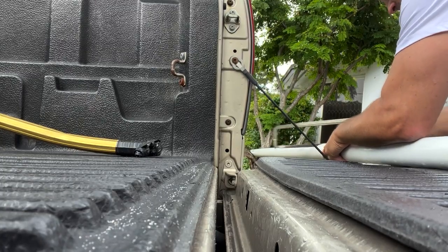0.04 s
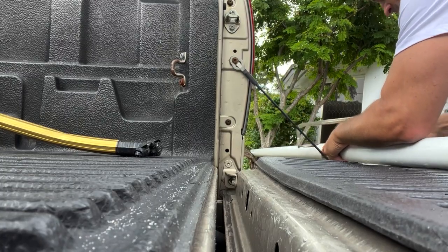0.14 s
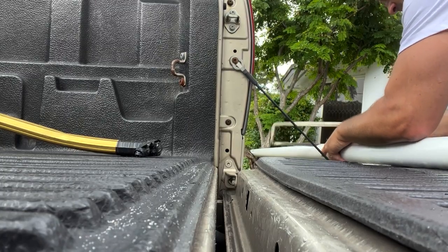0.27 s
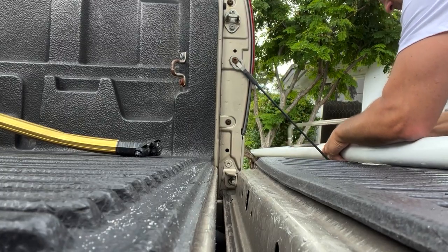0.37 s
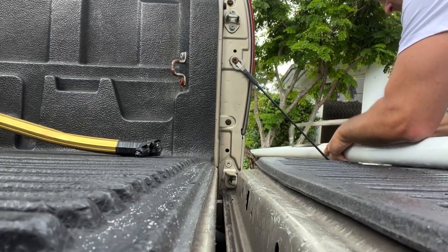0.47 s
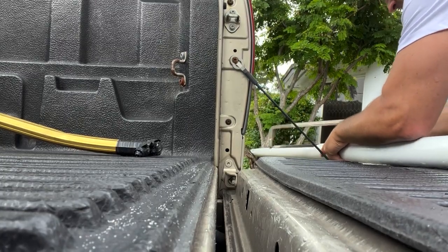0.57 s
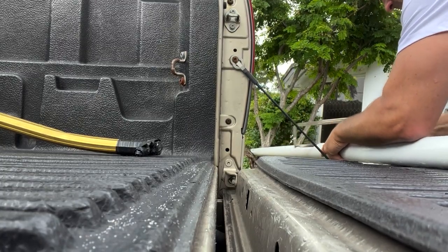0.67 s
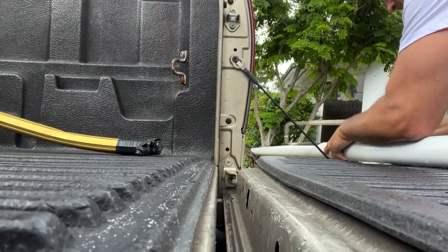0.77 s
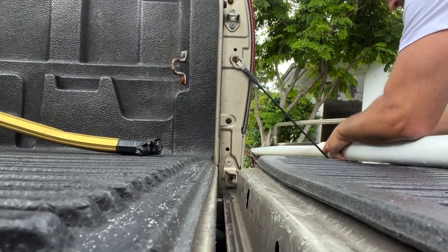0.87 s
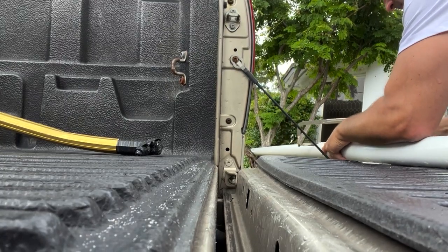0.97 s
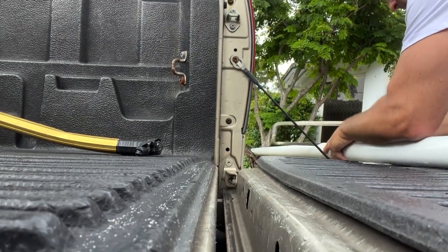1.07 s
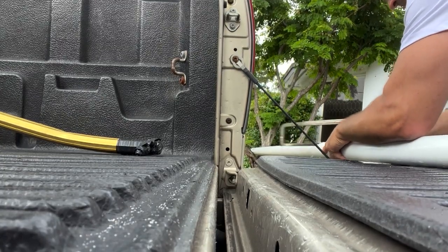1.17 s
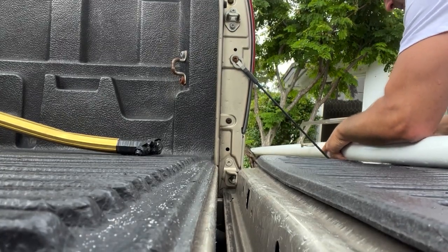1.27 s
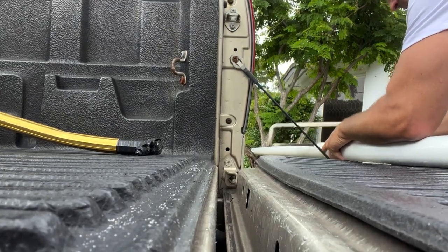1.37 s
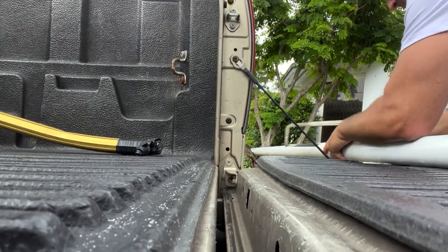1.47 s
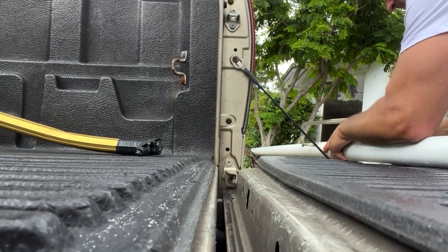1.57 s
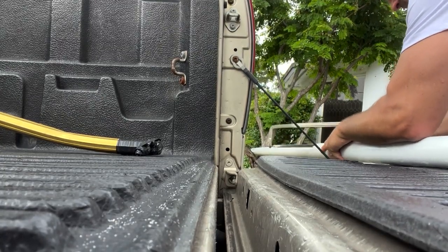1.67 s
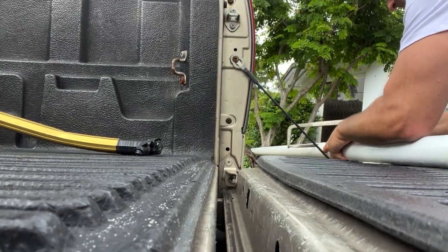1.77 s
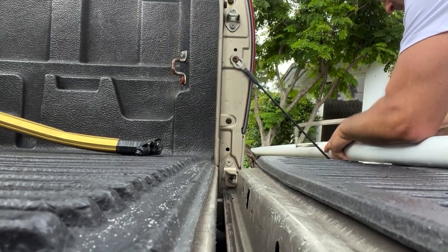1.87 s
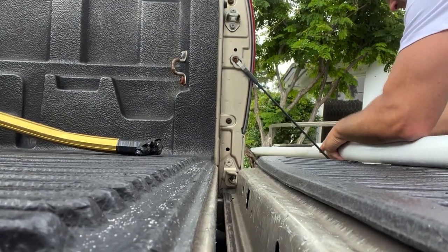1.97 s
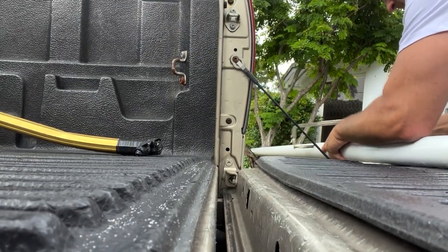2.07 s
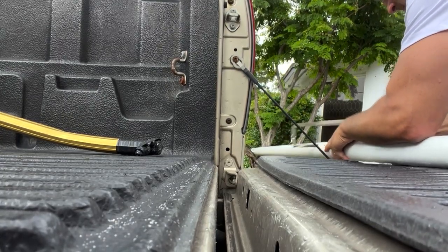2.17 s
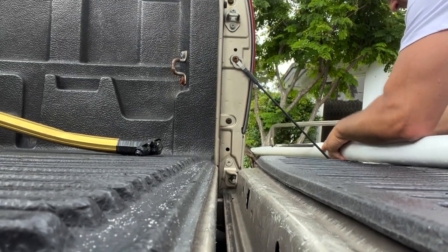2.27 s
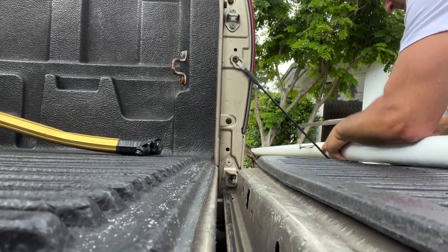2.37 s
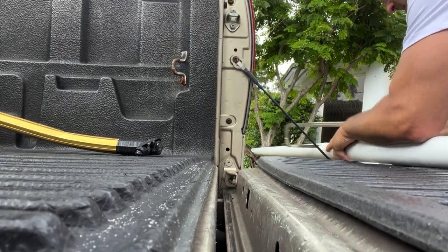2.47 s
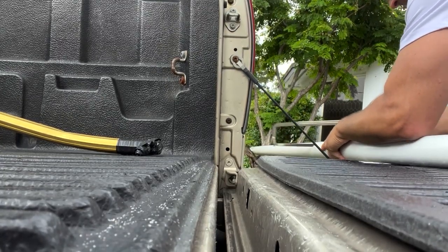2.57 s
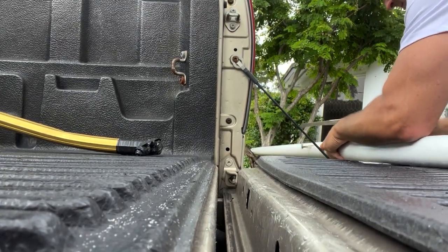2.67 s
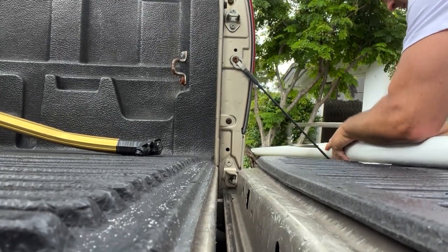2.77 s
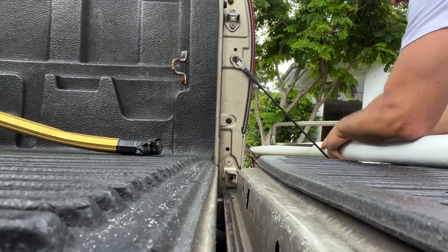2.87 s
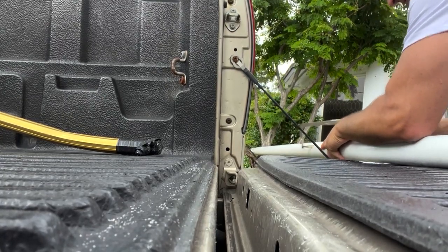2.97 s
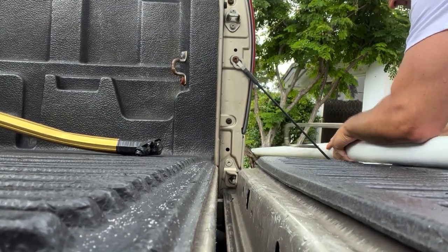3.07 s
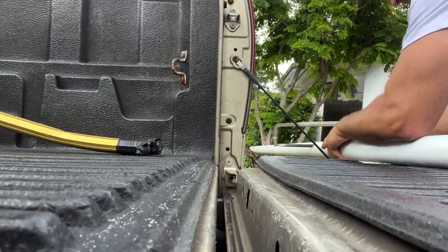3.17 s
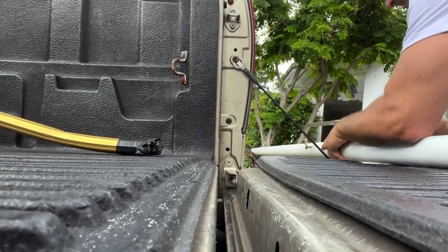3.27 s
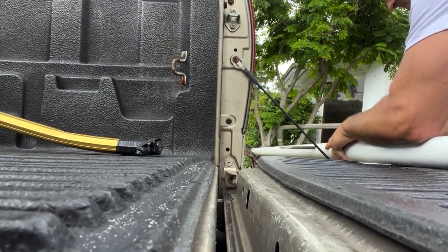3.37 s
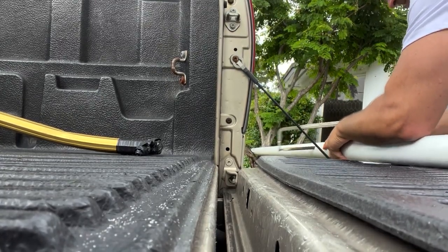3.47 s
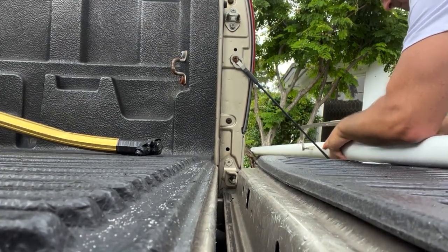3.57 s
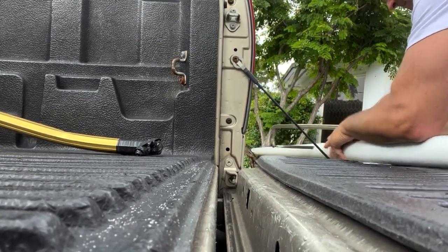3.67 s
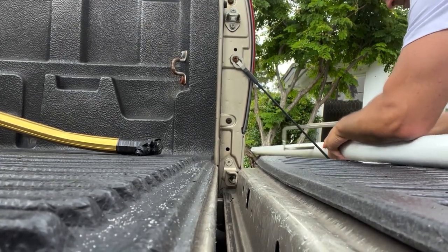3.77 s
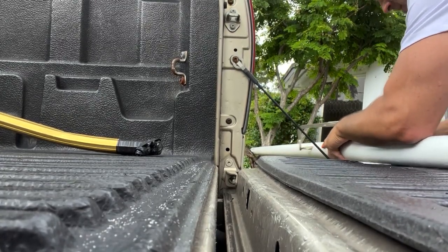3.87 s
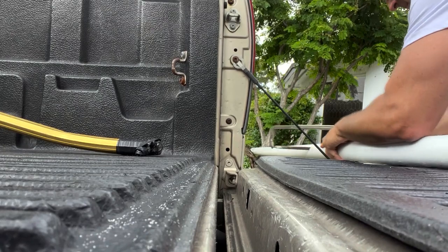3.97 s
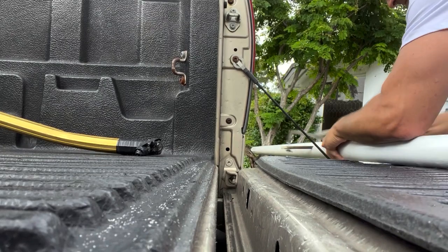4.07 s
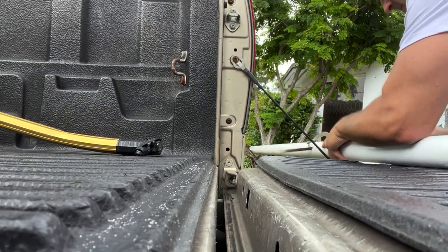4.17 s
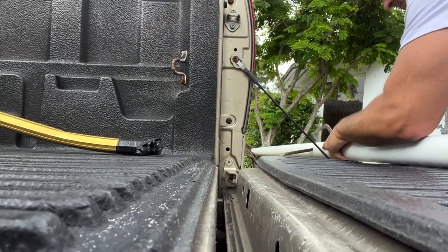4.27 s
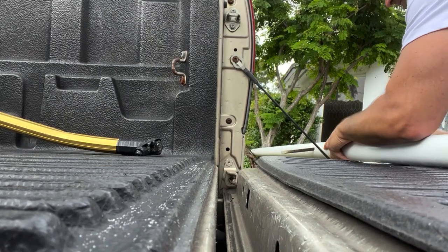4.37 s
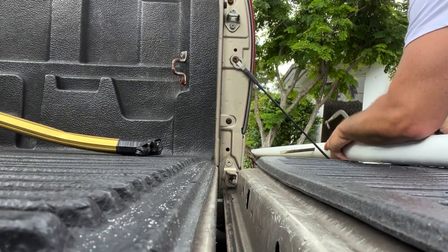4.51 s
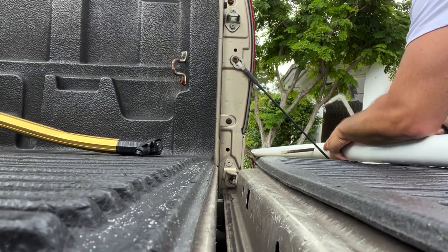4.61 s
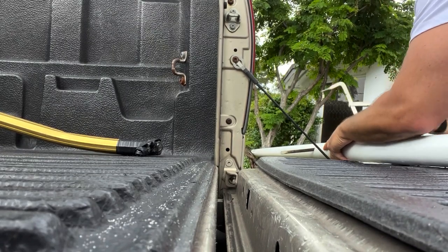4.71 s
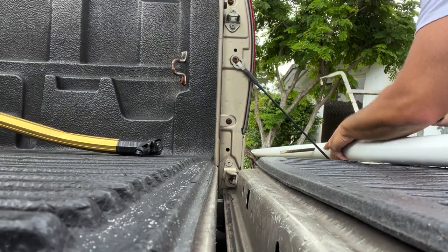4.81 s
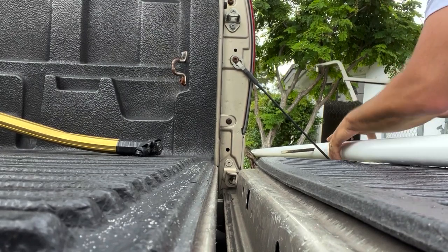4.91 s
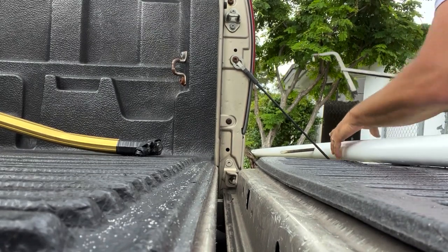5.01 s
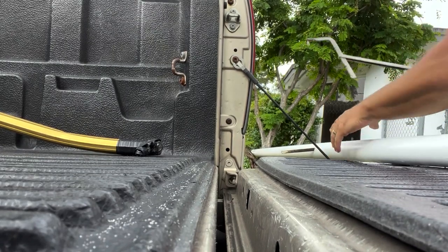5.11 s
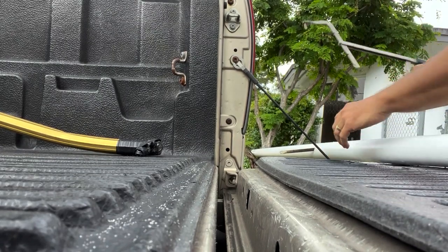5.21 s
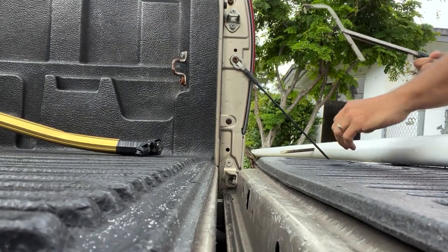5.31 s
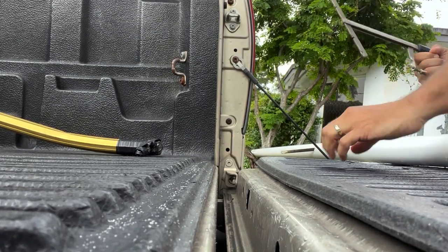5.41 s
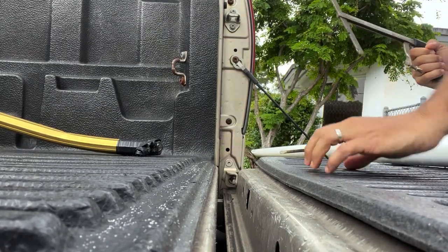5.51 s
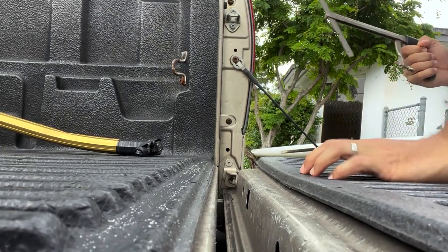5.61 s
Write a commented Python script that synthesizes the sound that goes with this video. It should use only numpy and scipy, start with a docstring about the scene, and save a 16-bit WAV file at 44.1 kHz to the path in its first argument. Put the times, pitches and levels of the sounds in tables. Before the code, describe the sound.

A hand hacksaw is already cutting a hollow plastic pipe on a truck's open tailgate, heard close in stereo from the bed, somewhat stronger on the right. The first second is hurried and uneven, with doubled bites; then the rhythm settles to about three and a half push-pull cycles a second. Every push starts abruptly: a sharp click, a hollow knock around 600 to 800 Hz, coarse juddering rasp and a low boom from the bed. Pulls are softer, scraping swells, many with a brief squeaky chatter near 1200 Hz, usually gliding down, brightest at the last, about 3.9 seconds. The last push is near 4.0, a faint pull follows, and sawing ends by about 4.3. Low distant traffic rumble, present throughout, is now exposed. A light tick comes at 4.7, fainter ones by 4.9, then a soft skin slide around 5.45 as the hand lets go.

```python
"""A hacksaw cuts a plastic pipe held on a truck's open tailgate, heard by two microphones in the bed.
From the start, far traffic rumbles low; pushes and pulls scrape the blade, judder the pipe and boom the bed.
The pushes slap the pipe on the tailgate, a click with a hollow knock; on pulls the teeth chatter at a pitch.
The sawing stops after about four seconds; then come light ticks of the saw frame and a hand sliding off.
Noise is shaped by filters and resonances; the chatter and the ringing pipe wall are made of sine waves."""
import sys
import numpy as np
from scipy import signal
from scipy.fft import rfft, irfft, next_fast_len
from scipy.io import wavfile
from scipy.ndimage import uniform_filter1d, map_coordinates

SR = 44100
rng = np.random.default_rng(int(sys.argv[2]) if len(sys.argv) > 2 else 0)


def generate_wav(signal):
    """Clip the signal to [-1, 1] and save it as 16-bit WAV at the path in sys.argv[1]."""
    frames = np.transpose(np.atleast_2d(signal))
    scaled = np.clip(frames, -1, 1) * 32767
    pcm = np.round(scaled).astype(np.int16)
    wavfile.write(sys.argv[1], SR, pcm)


N = 249165  # samples in the scene

# Table levels in dB are relative: each sound below adds its own shaping and natural unevenness.


def amp(db):
    """Turn decibels into a plain multiplier."""
    return 10 ** (np.asarray(db) / 20)


def unit(x):
    """Scale a sound to an average (RMS) strength of 1."""
    return x / np.sqrt(np.mean(x ** 2) + 1e-20)


def along(points, hz):
    """Read a curve of (pitch_hz, value) points, with pitch on a log axis."""
    f, v = np.transpose(points)
    return np.interp(np.log(hz + 1), np.log(f + 1), v)


def level_curve(rows):
    """Join (time_s, level_db) points into one level per sample."""
    time_s, level_db = np.transpose(rows)
    return np.interp(np.arange(N) / SR, time_s, level_db)


def wobble(rate):
    """A smooth random curve with this many random points a second."""
    points = rng.standard_normal(int(N * rate / SR) + 4)
    return map_coordinates(points, [np.arange(N) * rate / SR])


def filtered(x, response):
    """Multiply the spectrum of x by a response that depends on frequency."""
    m = next_fast_len(N + SR // 2)
    hz = np.fft.rfftfreq(m, 1 / SR)
    return irfft(rfft(x, m) * response(hz), m)[..., :N]


def coloured(x, spectrum):
    """Shape x to a spectrum with a filter that never sounds early, fading out beyond the spectrum's ends."""
    closed_ends = [(5, -80)] + list(spectrum) + [(SR / 2, -80)]

    def response(hz):
        # folding the cepstrum forward in time gives the minimum-phase filter
        cepstrum = irfft(np.log(amp(along(closed_ends, hz))))
        half = len(cepstrum) // 2
        cepstrum[1:half] *= 2
        cepstrum[half + 1:] = 0
        return np.exp(rfft(cepstrum))
    return filtered(x, response)


def resonant(x, modes):
    """Ring x through resonances given as (pitch_hz, width_hz, level_db)."""
    def response(hz):
        total = 0
        for k, (centre, width, db) in enumerate(modes):
            damping = 1j * hz * width
            # neighbouring resonances get opposite signs
            total = total + (-1) ** k * amp(db) * damping / (centre * centre - hz * hz + damping)
        return total
    return filtered(x, response)


def gritty(rate, spread_db, share, patchy_db):
    """Two unrelated streams of patchy noise, both jolted by the same random slips (rate per second)."""
    slips = (rng.random(N) < rate / SR) * amp(spread_db * rng.standard_normal(N))
    burst = signal.lfilter([1], [1, -np.exp(-1 / (.0012 * SR))], slips ** 2)  # power dies over 1.2 ms
    z = signal.stft(rng.standard_normal((2, N)), nperseg=256)[2]
    field = uniform_filter1d(rng.standard_normal(z.shape[1:]), size=3, axis=0)
    field = uniform_filter1d(field, size=8, axis=1)
    patchy = z * amp(patchy_db * unit(field))
    noise = signal.istft(patchy, nperseg=256)[1][:, :N]
    return noise * np.sqrt(abs(1 - share) + abs(share) * burst / burst.mean())


SPEED_UP, SLOW_DOWN = 0.49, 0.49  # shares of a swell's length in which it gains and loses 9 dB


def bell(t, at, length, rise=SPEED_UP, fall=SLOW_DOWN):
    """A rounded swell, in dB below its peak."""
    side = np.where(t < at, rise, fall)
    return -9 * ((t - at) / (length * side)) ** 2


# the blade bites forward; columns: start_s, held_s, boom_db, judder_db, scrape_db
PUSHES = [(0.0, 0.032, -18, -18, -31.5), (0.069, .055, -23.5, -14.5, -29.5),
          (0.267, 0.0072, -30, -24.5, -40), (0.347, 0.016, -28, -19.5, -31),
          (0.531, 0.077, -24.5, -17.5, -31), (0.615, 0.029, -24.5, -22, -31),
          (0.8093, .05, -24, -16, -29.5), (0.889, 0.03, -24.5, -19, -31.5),
          (1.0745, 0.087, -23.5, -18.5, -30), (1.3635, 0.088, -23, -19, -28.5),
          (1.656, 0.041, -25, -16.5, -28), (1.724, 0.085, -26, -22, -38), (1.9395, 0.1, -22, -18, -27.5),
          (2.2283, 0.034, -27.5, -17.5, -26.5), (2.5095, 0.034, -18.5, -15.5, -27.5),
          (2.815, 0.041, -24, -15, -27.5), (3.103, 0.026, -25, -15, -26.5), (3.1806, 0.029, -24, -21, -29),
          (3.3996, 0.051, -21.5, -19, -29.5), (3.4746, 0.021, -31, -24, -32),
          (3.6703, 0.044, -24.5, -18.5, -32), (3.958, 0.063, -24, -15.5, -26),
          (4.029, 0.017, -26.5, -25, -27)]
# the blade draws back; columns: fastest_s, length_s, boom_db, judder_db, scrape_db
PULLS = [(0.17, .06, -34, -34, -30), (0.301, 0.067, -36, -32.5, -38), (0.435, 0.095, -32, -34.5, -31),
         (0.71, 0.08, -34, -41, -36.5), (0.984, 0.074, -30, -36, -32), (1.287, 0.068, -36, -34.5, -30.5),
         (1.584, 0.074, -32.5, -35.5, -32.5), (1.855, 0.059, -36, -33, -31.5),
         (2.134, .07, -33.5, -31, -29.5), (2.416, 0.097, -29.5, -36, -32.5), (2.718, .08, -29, -39.5, -32),
         (3.014, 0.089, -32, -36, -34.5), (3.305, 0.061, -39, -38, -31.5), (3.584, 0.076, -30, -30, -30.5),
         (3.874, 0.063, -29.5, -39, -26.5), (4.118, 0.056, -31.5, -38, -42.5),
         (4.22, 0.028, -31, -41, -47.5)]
# settings below hold one value each for boom, judder and scrape
BITE_S = (0.02, 0.0055, 0.0021)  # how slowly a push starts
SAG_DB_PER_S, DROP_DB_PER_S = (31, 61.5, 107), (88.5, 126.5, 154)  # while held, and extra once let go
SPREAD = (3.3, 2.4, 1.04)  # multiplies the length of a pull
# the blade resting in the cut, until it is lifted out
CONTACT_DB, LIFT_S, LIFT_DB_PER_S = (-35, -38, -46.5), (4.27, 4.2, 4.08), (204, 170, 280)


def effort():
    """Loudness of boom, judder and scrape: pushes bite and die away, pulls swell, the resting blade fills in."""
    t = np.arange(N) / SR

    def column(values):
        return np.reshape(values, (-1, 1))

    lifted = np.maximum(t - column(LIFT_S), 0)
    power = amp(column(CONTACT_DB) - column(LIFT_DB_PER_S) * lifted) ** 2
    for start, held, *levels_db in PUSHES:
        at = round(start * SR)
        u = t[:SR // 2]
        let_go = np.maximum(u - held, 0)
        fall_db = column(SAG_DB_PER_S) * u + column(DROP_DB_PER_S) * let_go
        # a push at time zero is already under way
        rise = 1 - np.exp(-(u / column(BITE_S)) ** 2) if start else 1
        power[:, at:at + len(u)] += (rise * amp(column(levels_db) - fall_db)) ** 2
    for fastest, length, *levels_db in PULLS:
        middle = round(fastest * SR)
        span = slice(max(middle - SR // 4, 0), middle + SR // 4)
        swell_db = bell(t[span], fastest, length * column(SPREAD))
        power[:, span] += amp(column(levels_db) + swell_db) ** 2
    return np.sqrt(power)


# tone colour of the bed, the pipe and the blade; columns: pitch_hz, level_db
BOOM_COLOUR = [(20, -36), (35, -22), (60, -15), (100, -10.5), (160, -9), (200, -10.5), (260, -14.5),
               (350, -17.5)]
JUDDER_COLOUR = [(170, -29), (270, 0), (430, 0), (620, -2.5), (800, -0.5), (1000, -4.5), (1300, -8.5),
                 (1900, -10.5), (2600, -17.5), (3300, -21), (5000, -38.5)]
SCRAPE_COLOUR = [(900, 3), (1900, -8.5), (2650, -2), (3200, -9), (3700, -7), (4600, -10), (6000, -16),
                 (7200, -12), (8300, -20), (9300, -12), (10500, -12), (12000, -20.5), (13200, -25.5),
                 (14500, -21.5), (15500, -48)]
# resonances of the bed panels; columns: pitch_hz, width_hz, level_db
BED_RESONANCES = [(122, 20, -6), (152, 18, 3), (180, 22, -2), (208, 16, 0)]
# resonances of the hollow pipe, also used by the slaps; columns: pitch_hz, width_hz, level_db
PIPE_RESONANCES = [(620.5, 170, 7), (787, 536, -1), (438, 70, -4.5)]


def stroke(boom_gain, judder_gain, scrape_gain):
    """The teeth tear the plastic: the blade scrapes, the pipe judders, the bed booms."""
    lumps = wobble(45)  # uneven bite, felt by pipe and blade
    shake, panels = rng.standard_normal((2, 2, N))
    bed = unit(coloured(shake, BOOM_COLOUR) + amp(-4.0) * resonant(panels, BED_RESONANCES))
    boom = boom_gain * amp(2.0 * wobble(14)) * bed

    tear = gritty(300, 3.5, share=.45, patchy_db=1.5)
    pipe = unit(coloured(tear, JUDDER_COLOUR) + amp(-11) * resonant(tear, PIPE_RESONANCES))
    dull = filtered(pipe, lambda hz: 1 / (1 + (hz / 1500) ** 4))
    # a dying judder loses its treble first
    treble_gain = np.minimum(judder_gain / amp(-29.5), 1) ** 0.73
    pipe = dull + treble_gain * (pipe - dull)
    judder = judder_gain * amp(1.8 * lumps) * pipe

    tear = gritty(500, 3.5, share=.35, patchy_db=2.5)
    scrape = scrape_gain * amp(2.7 * lumps) * unit(coloured(tear, SCRAPE_COLOUR))
    return boom + judder + scrape


# lowest resonances of the tailgate; columns: pitch_hz, width_hz, level_db
GATE_RESONANCES = [(76, 12, 0), (55, 14, -9)]
SWAY_DB, SWAY_S = -9.5, .15  # rocking under the boom, and the time it is smoothed over


def tailgate(boom_gain):
    """The strokes shake the tailgate at its lowest resonances, with a sluggish rise and fall."""
    rocking = uniform_filter1d(boom_gain, round(SWAY_S * SR))
    rumble = resonant(rng.standard_normal((2, N)), GATE_RESONANCES)
    rumble = resonant(rumble, [(68, 60, 0)])
    return amp(SWAY_DB) * rocking * unit(rumble)


# loudness of the traffic, steady before the first row; columns: time_s, level_db
TRAFFIC = [(4.4, -50), (5.4, -50), (5.65, -47)]
# tone colour of the far rumble; columns: pitch_hz, level_db
TRAFFIC_COLOUR = [(30, -11), (60, 4.5), (110, -0.9), (200, -6), (400, -13), (800, -19), (1600, -27),
                  (3000, -38), (5000, -48), (8000, -55), (11000, -49.5), (14000, -70.5)]


def traffic():
    """A low far rumble, partly alike at both microphones in the bass and less so higher up."""
    a, b = unit(coloured(rng.standard_normal((2, N)), TRAFFIC_COLOUR))

    def shared(hz):
        return np.clip(0.58 / (1 + hz / 300), 0, 1)

    b = filtered(a, shared) + filtered(b, lambda hz: np.sqrt(1 - shared(hz) ** 2))
    return amp(level_curve(TRAFFIC) + 0.99 * wobble(8.3)) * np.array([a, b])


# the pipe slaps the tailgate; columns: start_s, crack_db, hollow_knock_db
SLAPS = [(0.069, -10.5, -5.5), (0.2684, -28.5, -8), (0.3167, -38.5, -21.5), (0.346, -17, -4.5),
         (0.5321, -9.5, -2), (0.6168, -20.5, -9), (0.8084, -11.5, -9.5), (0.891, -19.5, -7),
         (1.0751, -11.5, -3.5), (1.3638, -9, -3.5), (1.4432, -31, -12), (1.4834, -32.5, -21),
         (1.5876, -39.5, -26), (1.6576, -10.5, -5), (1.724, -23, -15.5), (1.8727, -38, -18.5),
         (1.9412, -12.5, -5), (2.2301, -13, -3), (2.436, -31.5, -24), (2.5101, -9.5, -3),
         (2.8154, -11.5, -0.5), (2.9293, -39, -15), (3.105, -12.5, -4), (3.1824, -28.5, -14),
         (3.1871, -21.5, -14.5), (3.3986, -12.5, 1), (3.4742, -22.5, -10), (3.5599, -33.5, -23),
         (3.6714, -13, -2.5), (3.9582, -14, 1), (4.0307, -24.5, -21)]
# tone colour of the crack; columns: pitch_hz, level_db
CRACK_COLOUR = [(500, -19.5), (1000, -9), (1900, 1), (2600, -6), (4600, -7.5), (6000, -15), (8000, -15),
                (10500, -32.5), (13500, -38.5), (15500, -47.5)]
# ringing of the pipe wall; columns: pitch_hz, level_db, time_to_fall_60_db_s
WALL_RINGS = [(1850, -2, .015), (2650, -3, .015), (3560, -5, .011), (4600, -5, .01)]


def slaps():
    """A rattling contact of a few ms rings the wall; two soft pushes then build up the hollow of the pipe."""
    crack, wall, blows = np.zeros((2, N + SR)), np.zeros((2, N + SR)), np.zeros((2, N))
    t = np.arange(SR // 10) / SR
    contact = (1 - np.exp(-t / .0003)) * amp(-700 * t) / (1 + (t / .005) ** 5)
    noise = coloured(rng.standard_normal((2, N)), CRACK_COLOUR)
    for start, crack_db, knock_db in SLAPS:
        at = round(start * SR)
        span = slice(at, at + len(t))
        rattle = contact * noise[:, span]
        # even out the energy of the rattles before setting the level
        even_rattle = rattle / np.linalg.norm(rattle[0]) * np.linalg.norm(contact)
        crack[:, span] += amp(crack_db + 1.5) * even_rattle
        for hz, level, t60 in WALL_RINGS:
            ring = np.sin(2 * np.pi * (hz * t + rng.random((2, 1))))
            ring_db = crack_db + 3.5 + level + rng.normal(0, 1.9) - 60 * t / t60
            wall[:, span] += amp(ring_db) * (1 - np.exp(-t / .0006)) * ring
        blows[:, at + round(.0022 * SR)] = 0.33 * amp(knock_db + 28.5)
        blows[:, at + round(.0039 * SR)] = amp(knock_db + 30)
    soft = filtered(blows, lambda hz: 1 / (1 + 1j * hz / 1500) ** 2)
    knock = resonant(soft, PIPE_RESONANCES)
    # the bed walls scatter less of a slap: the second stream is 4 dB weaker
    return (crack[:, :N] + wall[:, :N] + knock) * amp([[0], [-4]])


# the teeth skip on a pull; columns: loudest_s, length_s, from_hz, to_hz, tone_db, overtone_db
CHATTER = [(0.44, .04, 1191, 1000, -17, -50), (0.731, 0.052, 1155, 1016, -22, -53),
           (0.977, .06, 1312, 1269, -25, -53), (1.274, 0.083, 1327, 1088, -22, -40),
           (1.575, 0.078, 1287, 1314, -28.5, -53), (1.864, .06, 1200, 1060, -29, -50),
           (2.135, 0.059, 1342, 1190, -16, -30), (2.409, .07, 1430, 1200, -29, -47),
           (2.728, 0.063, 1297, 1300, -26, -44), (2.996, 0.048, 1310, 1350, -22, -43),
           (3.302, 0.068, 1363, 1050, -21, -36.5), (3.576, 0.058, 1340, 1160, -17.5, -34.5),
           (3.873, 0.069, 1450, 1274, -15.5, -23.5)]
# overtones of the tooth rate; columns: multiple (no unit), level_db
OVERTONES = [(2, 4), (3, -6.5), (4, -13)]
BEND = 1.5  # the tooth rate changes little at first and faster late (1 = evenly)
CATCH, SLIP = .4, .5  # shares of the length in which the tone gains and loses 9 dB


def chatter():
    """On a fast pull the teeth skip regularly: a gliding tone with overtones, blurred by uneven teeth."""
    out, t = np.zeros((2, N)), np.arange(N) / SR
    drift = np.array([wobble(250), wobble(250)])
    uneven = 1 + .45 * np.array([wobble(330), wobble(330)])
    flicker = 1 + .4 * np.array([wobble(200), wobble(200)])
    for loudest, length, from_hz, to_hz, tone_db, bright_db in CHATTER:
        middle = round(loudest * SR)
        span = slice(middle - SR // 10, middle + SR // 10)
        # the glide may run on a little past to_hz
        progress = np.clip((t[span] - loudest) / length + .5, 0, 1.3)
        hz = from_hz + (to_hz - from_hz) * progress ** BEND
        turn = 2 * np.pi * np.cumsum(hz * (1 + .026 * drift[:, span]), axis=1) / SR
        fade = amp(bell(t[span], loudest, length, CATCH, SLIP))
        tone = amp(tone_db) * uneven[:, span] * np.sin(turn)
        upper = sum(amp(level) * np.sin(k * turn) for k, level in OVERTONES)
        # overtones fade twice as steeply as the tone
        out[:, span] += fade * (tone + fade * amp(bright_db) * flicker[:, span] * upper)
    return out


# light touches of the saw frame; columns: start_s, level_db
TICKS = [(4.6867, -45.5), (4.762, -61), (4.861, -51.5)]
# tone colour of a tick; columns: pitch_hz, level_db
TICK_COLOUR = [(1000, -4), (1600, -7), (3000, -8), (5000, -12), (8000, -12), (11000, -14), (14000, -26)]


def ticks():
    """The frame brushes the pipe: bursts of noise with a soft start and a scattered tail."""
    out, t = np.zeros((2, N + SR)), np.arange(SR // 5) / SR
    shape = (amp(-60 * t / .05) + .6 * amp(-60 * t / .2)) * (1 - np.exp(-t / .001))
    for start, db in TICKS:
        at = round(start * SR)
        out[:, at:at + len(t)] += amp(db + 1.0) * shape * rng.standard_normal((2, len(t)))
    return coloured(out[:, :N], TICK_COLOUR)


# loudness of the sliding hand; columns: time_s, level_db
HAND = [(5.05, -93), (5.3, -66), (5.4, -67.5), (5.43, -56), (5.46, -50), (5.51, -53.5), (5.65, -66)]
# tone colour of skin on the pipe; columns: pitch_hz, level_db
HAND_COLOUR = [(400, 0), (800, 3.5), (1600, -14.5), (3000, -17.5), (5000, -19.5), (8000, -24.5),
               (11000, -28), (14000, -31)]


def hand():
    """Skin drags over the pipe as the hand lets go: gritty noise that swells and fades."""
    drag = gritty(200, 3, share=.35, patchy_db=3)
    return amp(level_curve(HAND) + 1.5 * wobble(45)) * unit(coloured(drag, HAND_COLOUR))


# level difference of the two microphones; columns: pitch_hz, left_minus_right_db
LOUDER = [(60, -1), (200, -3), (600, -6.5), (1300, -3.5), (2200, -0.5), (3200, -3.5), (4600, -4.5),
          (6000, -6), (8000, -1), (10000, -0.2), (14000, 0)]
# phase of the left one, negative when it lags; columns: pitch_hz, left_leads_rad
LEADS = [(0, 0), (60, -.3), (130, -.9), (270, -1.2), (690, -2.8), (1550, -3.2), (1950, -6), (2670, -7.3),
         (3100, -8.3), (6200, -10.3), (7100, -9.8), (8600, -9.3), (10800, -6.5), (12900, -6.2),
         (13900, -3.4), (15300, -3.1)]
# how much the left shares with the right; columns: pitch_hz, likeness (0 to 1, no unit)
ALIKE = [(40, 0.76), (250, .75), (600, 0.69), (1100, 0.55), (1900, 0.3), (2700, 0.25), (4000, 0.054),
         (6000, 0.28), (7500, 0.92), (8400, 0.83), (9800, 0.48), (11000, .98), (12700, 1), (13500, 0.69),
         (14600, 1)]


def ports(pair):
    """The right faces the saw; the left is later, weaker near 600 and 6000 Hz, mixed with bed-wall scatter."""
    direct, scattered = pair

    def alike(hz):
        return np.clip(along(ALIKE, hz), 0, 1)

    def late(hz):
        # each side takes half of the level difference
        return amp(along(LOUDER, hz) / 2) * np.exp(1j * np.interp(hz, *np.transpose(LEADS)))

    left = filtered(direct, lambda hz: late(hz) * alike(hz))
    left = left + filtered(scattered, lambda hz: late(hz) * np.sqrt(1 - alike(hz) ** 2))
    right = filtered(direct, lambda hz: amp(-along(LOUDER, hz) / 2))
    return np.array([left, right])


def scene():
    """Add up the saw, ticks and hand as heard from the bed, with the traffic behind."""
    boom_gain, judder_gain, scrape_gain = effort()
    saw = stroke(boom_gain, judder_gain, scrape_gain) + tailgate(boom_gain)
    saw = saw + slaps() + chatter()
    return ports(saw + ticks() + hand()) + traffic()


TOP_HZ = 15730  # nothing is kept from here up


def record(dry):
    """Round off the loudest peaks just below full scale, then cut the highest treble."""
    soft = dry / (1 + abs(dry / .97) ** 6) ** (1 / 6)
    return filtered(soft, lambda hz: hz < TOP_HZ)


dry = scene()
out = record(dry)
generate_wav(out)
```